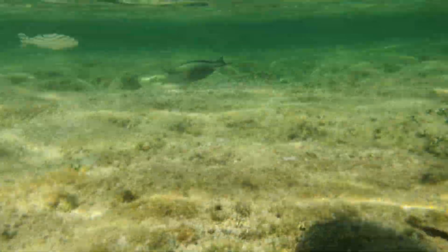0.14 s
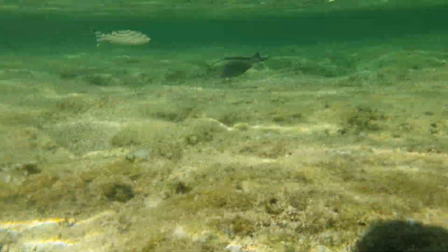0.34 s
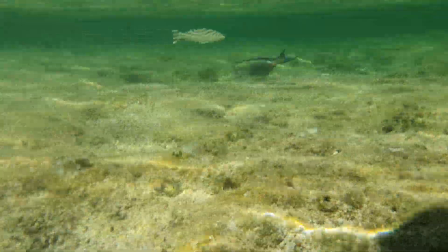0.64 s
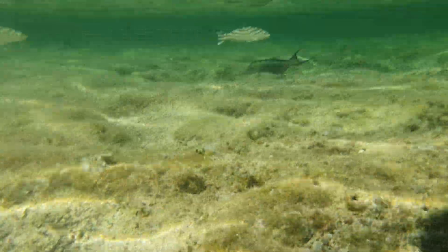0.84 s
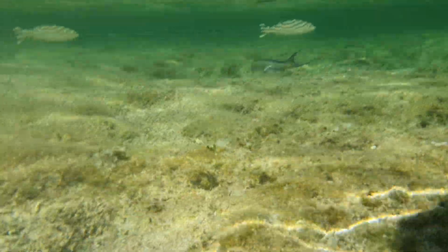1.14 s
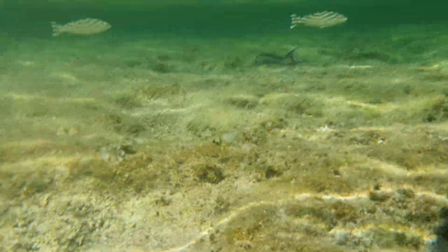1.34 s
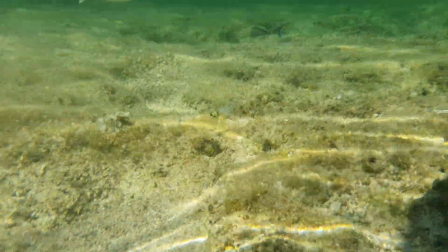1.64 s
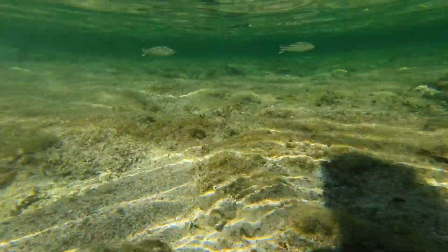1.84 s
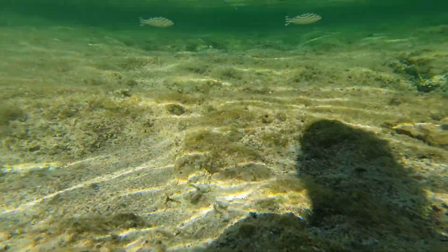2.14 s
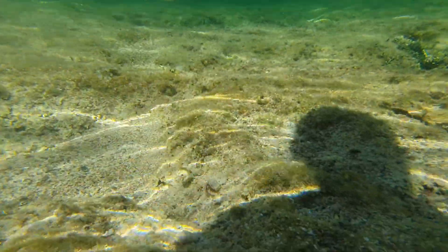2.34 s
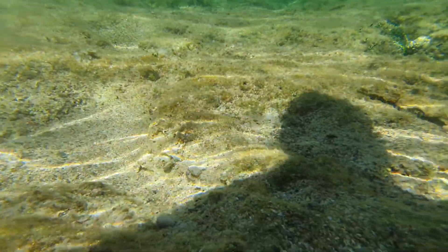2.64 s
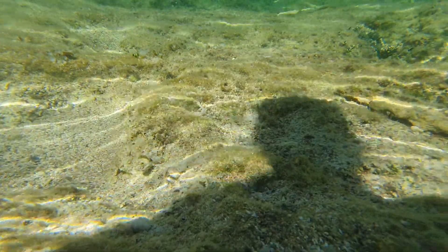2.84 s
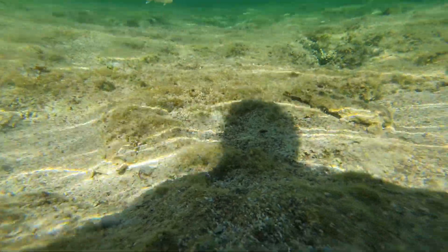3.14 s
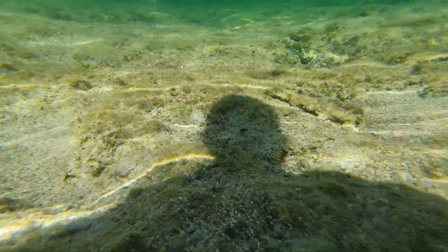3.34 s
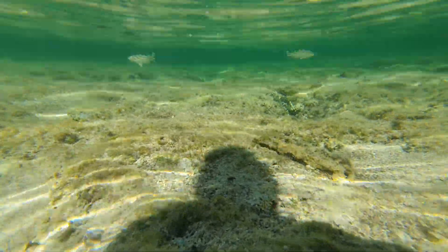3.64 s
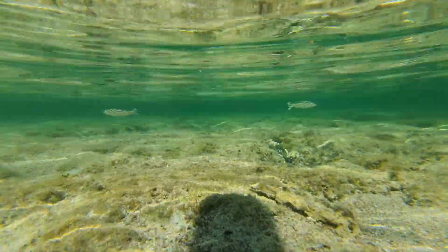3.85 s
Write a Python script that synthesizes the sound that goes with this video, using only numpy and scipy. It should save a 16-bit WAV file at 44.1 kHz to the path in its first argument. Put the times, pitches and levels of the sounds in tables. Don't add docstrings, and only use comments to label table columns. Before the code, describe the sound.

Deep, uneven underwater rumble runs throughout, heard from inside a sealed camera housing in shallow sea. Small ticks and knocks open it; a heavy thump with a bubble comes at 0.4 s. The rumble swells around 1.2-1.5 s, with softer bumps and very faint hiss and rubbing. Bubbles gulp from 3.2 s, water slaps with clustered knocks and heavy bumps at 3.65-3.75 s, then again at 3.87 s, with a hard crack at 3.91 s.

```python
import sys
import numpy as np
from scipy import signal
from scipy.fft import rfft, irfft
from scipy.io import wavfile

SR = 44100
rng = np.random.default_rng(int(sys.argv[2]) if len(sys.argv) > 2 else 0)


def inscribe(sig):
    pcm = np.round(np.clip(np.atleast_2d(sig).T, -1, 1) * 32767)
    wavfile.write(sys.argv[1], SR, pcm.astype(np.int16))


def volts_from_decibels(level):
    exponent = np.asarray(level, float) / 20
    return 10 ** exponent


N = 176400

# t/s, level/dB
FLOW_DB = [(0, -35.5), (.11, -37.5), (.79, -36.5), (.96, -34.5), (1.14, -38.5), (1.21, -31), (1.45, -31.5),
           (1.71, -35), (1.86, -31), (2.55, -35), (3.36, -31.5), (3.63, -26), (3.76, -23), (3.82, -35),
           (3.92, -22), (4, -33.5)]
# f/Hz, density/dB per Hz
RUMBLE_SPECTRUM = [(18, -27.5), (30, -8), (43, 2), (72, 3), (125, -6), (175, -3), (215, -7.5), (310, -28),
                   (520, -43.5), (700, -79)]
# t/s, peak level/dB, f/Hz
BUMPS = [(0.434, -12.5, 96.4), (0.434, -0.5, 252.3), (1.198, -21, 170), (1.364, -13.5, 92),
         (1.379, -15.5, 68), (1.475, -14, 178), (2.233, -18, 129), (2.302, -17.5, 188), (2.968, -18.5, 74),
         (3.088, -19, 173), (3.222, -12.5, 244), (3.408, -12, 96), (3.52, -16.5, 106.6),
         (3.688, -13.5, 165), (3.705, -15, 59), (3.746, -1, 162), (3.871, -5, 167), (3.913, -10, 147.6)]
# t/s, peak level/dB, f/Hz
KNOCKS = [(0.115, -28.5, 2130), (0.13, -39, 1750), (0.164, -38, 1740), (0.178, -44, 764),
          (0.575, -35.5, 1780), (0.143, -44, 3700), (0.628, -41.5, 680), (0.735, -45.5, 770),
          (0.754, -43, 759), (0.874, -32, 2850), (0.937, -35, 706), (1.378, -37, 1700), (1.704, -38, 2400),
          (1.825, -38, 790), (1.991, -38, 830), (2.053, -46.5, 604), (1.478, -45, 700), (3.226, -47.5, 840),
          (3.584, -40, 1720), (3.636, -39, 1090), (3.674, -42, 1870), (3.684, -36.5, 1940),
          (3.702, -23.5, 1470), (3.708, -21, 1260), (3.721, -31, 1970), (3.727, -58, 1050),
          (3.737, -34, 1900), (3.654, -22, 1650), (3.699, -21, 2130), (3.748, -17.5, 920),
          (3.852, -31, 1800), (3.858, -23, 784), (3.862, -23, 983), (3.872, -23, 1000), (3.879, -41, 1050),
          (3.887, -32, 895), (3.894, -45, 1750), (3.970, -38, 1800), (3.991, -37, 2000)]
# t/s, peak level/dB, f/Hz, glide/octaves per s, t60/s
BUBBLES = [(.441, -15, 340, 0.1, 0.065), (.460, -52, 780, 0.61, .1), (3.224, -25.5, 516, 140, .03),
           (3.227, -22.5, 458, 0.46, 0.067), (3.264, -42.5, 900, 9.4, 0.027), (3.410, -19, 730, 72, 0.03),
           (3.425, -30, 780, 1.4, 0.07), (3.45, -34.5, 1025, 8, 0.048), (3.454, -52, 1830, 0.35, 0.052),
           (3.517, -32.5, 500, 5.5, 0.046), (3.519, -44, 870, 14, 0.069), (3.516, -47, 1800, 0.36, 0.08),
           (3.845, -27, 384, 2.8, 0.032), (3.864, -23.5, 414, 3, 0.042)]
# f/Hz, level/dB, t60/s
CRACK_MODES = [(1170, 7, 0.013), (2100, 12, 0.010), (620, -3, .008), (3560, -24, .005)]
# t/s, level/dB
WASH_DB = [
    (3.45, -71.5),
    (3.58, -54),
    (3.645, -55),
    (3.66, -46),
    (3.71, -42),
    (3.77, -51),
    (3.825, -62),
    (3.865, -46),
    (3.905, -62.5),
    (3.96, -55.5),
]
# f/Hz, density/dB per Hz
WASH_SPECTRUM = [(400, 2.5), (900, -4.5), (2100, 1), (3200, -26.5), (5000, -25), (7800, -40.5),
                 (11000, -27.5), (15500, -50.5)]
# t/s, bright peak level/dB, dull part re bright/dB
TICKS = [(0.1152, -49.5, 4), (0.1315, -54, 9.5), (0.1532, -54.5, 0), (0.165, -44, 9), (0.1763, -49, 11),
         (0.5738, -43, -5.5), (0.2157, -63, 5), (0.2577, -69.5, 2), (0.7353, -67, 8), (0.872, -64, 12),
         (0.9065, -68, 14), (0.9344, -60, 14), (0.9557, -55, 3), (1.1027, -68, 2), (1.2964, -54.5, 3),
         (1.3887, -63, 12), (1.4733, -61, -8), (1.8208, -54.5, -1), (1.3483, -65, 17.5), (2.2853, -51, -2),
         (2.366, -54, 0), (2.9398, -50.5, -4.5), (3.0769, -56, 9), (3.039, -63, -3.5), (3.235, -56.5, 2),
         (3.2856, -57.5, 11), (3.4639, -46.5, 3), (3.5847, -55.5, 3), (3.606, -43, 5.5), (3.634, -44, 3.5),
         (3.6106, -46.5, 4), (3.6507, -49, 4.5), (3.667, -47, 12.5), (3.68, -44.5, 0.5), (3.698, -34, 9),
         (3.713, -38.5, 5), (3.722, -44.5, 6), (3.7298, -44.5, -1), (3.7655, -51.5, 17),
         (3.7904, -50, 13.5), (3.8138, -49, -3), (3.839, -44, 4), (3.863, -59, 8), (3.93, -62, 10),
         (3.9523, -55, 10), (3.991, -53.5, 10)]
# f/Hz, width/Hz, level re plain path/dB
SHELL_MODES = [(780, 200, 4.5), (1800, 110, 2), (4080, 420, 11), (10400, 5200, -2)]
# f/Hz, width/Hz, level/dB
SEEP_MODES = [(1776, 57, 1.5), (2293, 337, 7.5), (2470, 254, -8)]
# t/s, level/dB
SEEP_DB = [
    (0, -70),
    (.9, -65.5),
    (1.7, -59.5),
]
# start t/s, length/s, level/dB, f/Hz
RUBS = [
    (1.318, 0.23, -62.5, 1280),
    (1.787, 0.29, -60, 1640),
    (2.065, 0.11, -60.5, 1730),
    (2.194, 0.21, -65.5, 1650),
]
# start t/s, length/s, level re still air/dB
FIZZ_SWELLS = [
    (0, 0.093, 6),
    (0.092, .2, 9),
    (0.554, 0.088, 5),
    (0.853, 0.16, 5),
    (1.094, 0.054, 4),
    (1.278, 0.27, 7.5),
    (1.508, 1.9, 4),
    (3.017, 0.13, 3),
    (3.204, 0.19, 8.5),
    (3.423, 0.18, 8),
]
# f/Hz, density/dB per Hz
HISS_SPECTRUM = [(350, -6), (900, -7.5), (1500, -13), (2200, -4), (3200, -25.5), (4500, -27.5), (5500, -33),
                 (6600, -33.5), (7600, -51), (15500, -46)]
# t/s, level/dB
SONG_DB = [
    (1.509, -84),
    (1.6, -80),
    (2.851, -79),
    (2.911, -79),
]
INSECT_BAND_HZ = [9500, 11100]
# f/Hz, level/dB
PORT_TILT_DB = [(100, -.1), (300, -.9), (520, -1), (700, 5.0), (1500, 6.5), (2500, 3), (3300, 7), (5500, 7),
                (7500, 3), (10000, -7.0), (13000, -1.5)]
# f/Hz, level/dB
PORT_OWN_DB = [(30, -26), (150, -15), (400, -7), (700, -1), (1400, 0), (2300, -4), (3300, 5), (10000, 6)]


def table(rows, at, log=False):
    x, y = np.transpose(rows)[:2]
    return np.interp(np.log(at + 1), np.log(x + 1), y) if log else np.interp(at, x, y)


def clock():
    return np.arange(N) / SR


def rms_one(x):
    return x / np.sqrt(np.mean(x ** 2) + 1e-20)


def band(x, order, edges_hz):
    sos = signal.butter(order, edges_hz, "band", fs=SR, output="sos")
    return signal.sosfilt(sos, x + 1e-18)


def drift(rate_hz):
    r = np.exp(-80 * np.pi * rate_hz / SR)
    white = rng.standard_normal(N // 40 + 2002)
    slow = signal.lfilter([1], [1, -2 * r, r * r], white)[2000:]
    return np.interp(np.arange(N) / 40, np.arange(len(slow)), rms_one(slow))


def peak(x, f_hz, width_hz):
    r = np.exp(-np.pi * width_hz / SR)
    zeros = np.array([1, 0, -1]) * (1 - r * r) / 2
    poles = [1, -2 * r * np.cos(2 * np.pi * f_hz / SR), r * r]
    return signal.lfilter(zeros, poles, x + 1e-18)


def add(out, start_s, level_db, f_hz, t60_s, rise_s=1e-4, glide_oct_s=0.):
    t = np.arange(int(.15 * SR)) / SR
    rise = 1 - np.exp(-(t / rise_s) ** 2)
    burst = np.exp(-(glide_oct_s * t) ** 6)
    phase = 2 * np.pi * np.cumsum(f_hz * 2 ** (glide_oct_s * t)) / SR
    swing = volts_from_decibels(level_db - 60 * t / t60_s) * rise * burst * np.sin(phase)
    i = int(start_s * SR)
    out[..., i:i + len(t)] += swing[..., :N - i]


def coloured(spectrum, together_db, own_db, rate_hz):
    hz = np.arange(N // 2 + 1) * SR / N
    low_hz, high_hz = spectrum[0][0], spectrum[-1][0]
    mids_hz = low_hz * 2 ** np.arange(0, np.log2(high_hz / low_hz) + .5, .5)
    white = rfft(rng.standard_normal((3, N))) * volts_from_decibels(table(spectrum, hz, True))
    together = drift(rate_hz)
    out = 0
    for mid_hz in mids_hz:
        share = np.cos(np.pi * np.clip(np.log2((hz + 1) / mid_hz), -.5, .5)) ** 2
        flicker_db = together_db * together + own_db * drift(rate_hz * 2)
        out = out + irfft(white * share, N) * volts_from_decibels(flicker_db)
    return rms_one(out)


def grains(per_s, spread_db):
    hit = rng.random(N) < per_s / SR
    size = volts_from_decibels(spread_db * np.minimum(rng.exponential(1, N), 4))
    return hit * size * rng.choice([-1, 1], N)


def shell(x):
    return x + sum((volts_from_decibels(db) - 1) * peak(x, hz, width) for hz, width, db in SHELL_MODES)


def rumble():
    water = coloured(RUMBLE_SPECTRUM, 2.2, 1.28, 10.9)
    eddies = band(grains(44, 3.4), 4, [55, 220])
    water[0] += volts_from_decibels(-9.5) * rms_one(eddies)
    return volts_from_decibels(table(FLOW_DB, clock()) + 2) * water


def bumps():
    out = np.zeros(N)
    for s, db, hz in BUMPS:
        add(out, s, db - 3 + 11.5, hz, t60_s=2.91 / hz + 0.014, rise_s=0.0048)
    return out


def knocks():
    out = np.zeros(N)
    trim_db = 2
    snap_modes = ((700, -4.0), (1250, -22.5), (2300, -7.0), (4200, -27.0))  # Hz, dB
    for s, db, hz in KNOCKS:
        add(out, s, db + trim_db - 4.0, hz, t60_s=21 / hz, rise_s=.0008)
        for snap_hz, snap_db in snap_modes:
            level_db = db + trim_db + snap_db + rng.normal(0, 3)
            add(out, s, level_db, snap_hz * rng.uniform(0.73, 1.203), t60_s=0.0073, rise_s=.0003)
    return out


def bubbles():
    out = np.zeros(N)
    for s, db, hz, glide_oct_s, t60_s in BUBBLES:
        add(out, s, db, hz, t60_s, 1.42 / hz, glide_oct_s)
    return out


def crack():
    out = np.zeros(N)
    for hz, db, t60_s in CRACK_MODES:
        add(out, 3.9132, db - 8, hz, t60_s, rise_s=.0009)
    return out


def wash():
    t = clock()
    water = coloured(WASH_SPECTRUM, 2.2, 2.5, 56)
    drops = grains(460, 5.5) * rng.standard_normal((3, N))
    spray = rms_one(band(drops, 2, [8500, 12500]))
    spray = volts_from_decibels(-22) * spray * np.clip((t - 3.56) / 0.014, 0, 1)
    splat = band(grains(900, 4.6), 4, [900, 2300])
    water[0] += volts_from_decibels(-4) * rms_one(splat)
    onset = np.clip((t - WASH_DB[0][0]) / 0.026, 0, 1)
    return volts_from_decibels(table(WASH_DB, t)) * onset * shell(water + spray)


def ticks():
    out = np.zeros((2, N))
    for s, db, dull_db in TICKS:
        modes = ((9700, 4.5), (11200, 11.0), (12000, -6.0), (2400, dull_db),
                 (3900, dull_db - 3.5), (5600, dull_db - 3.0), (7100, dull_db - 4))
        for row in out:
            for hz, part_db in modes:
                level_db = db - 8.5 + part_db + rng.normal(0, 2.9)
                add(row, s, level_db, hz * rng.uniform(0.84, 1.27), t60_s=14 / hz, rise_s=1 / hz)
    return out


def seep():
    t = clock()
    white = rng.standard_normal((3, N))
    air = sum(volts_from_decibels(db) * peak(peak(white, hz, width), hz, 2 * width) for hz, width, db in SEEP_MODES)
    on = np.clip((1.715 - t) / 0.0056, 0, 1)
    return volts_from_decibels(table(SEEP_DB, t) + 1.5 * drift(30)) * on * rms_one(air)


def rubs():
    t = clock()
    white = rng.standard_normal((3, N))
    out = np.zeros((3, N))
    for s, length_s, db, hz in RUBS:
        stroke = np.sin(np.pi * np.clip((t - s) / length_s, 0, 1)) ** 1.66
        friction = rms_one(peak(peak(white, hz, 560), hz, 870))
        out += volts_from_decibels(db + 1.1 * drift(40)) * stroke * friction
    return out


def fizz():
    t = clock()
    swell_db = sum(db * np.sin(np.pi * np.clip((t - s) / length_s, 0, 1)) ** .8
                   for s, length_s, db in FIZZ_SWELLS)
    crackle = np.abs(rms_one(grains(300, 5.0)))
    air = rng.standard_normal((3, N)) * (1 + volts_from_decibels(-5.5) * crackle)
    mid_hz, width_hz = 10500, 2500
    air = rms_one(band(air, 3, [mid_hz - width_hz / 2, mid_hz + width_hz / 2]))
    return volts_from_decibels(-86.5 - 8 + swell_db + 1.5 * drift(15)) * air


def hiss():
    return volts_from_decibels(-65) * rms_one(shell(coloured(HISS_SPECTRUM, 1.0, 1.0, 25)))


def insect():
    t = clock()
    rate_hz = 441 * (1 + 0.0016 * drift(4.0) + 0.046 * rng.standard_normal(N))
    turns = np.cumsum(rate_hz) / SR
    clicks = np.diff(np.floor(turns), prepend=0) * volts_from_decibels(4.0 * rng.standard_normal(N))
    tone = peak(clicks, 10140, 4.0 / 0.0026)
    tone = rms_one(band(tone, 4, INSECT_BAND_HZ))
    on = np.clip(np.minimum(t - SONG_DB[0][0], SONG_DB[-1][0] - t) / 0.017, 0, 1)
    pan_db = -17
    pan = volts_from_decibels(np.array([[pan_db / 2], [-pan_db / 2]]))
    return on * volts_from_decibels(table(SONG_DB, t) + 2.0 * drift(25)) * tone * pan


def ports(rows):
    size = N + 4096
    hz = np.arange(size // 2 + 1) * SR / size
    padded = np.pad(rows, ((0, 0), (2048, 2048)), "reflect", reflect_type="odd")
    shared, left, right = rfft(padded)
    lag_s = 33 / 44100
    lag_rad = (2 * np.pi * lag_s * hz - .9) / (1 + (520 / (hz + 1)) ** 4)
    own = volts_from_decibels(table(PORT_OWN_DB, hz, True))
    pair = np.array([shared + own * left, shared * np.exp(-1j * lag_rad) + own * right])
    tilt = volts_from_decibels(table(PORT_TILT_DB, hz, True) * [[.5], [-.5]])
    return irfft(pair * tilt, size)[:, 2048:-2048]


def scene():
    rows = rumble() + wash() + seep() + rubs() + fizz() + hiss()
    rows[0] += bumps() + knocks() + bubbles() + crack()
    rows[1:] += ticks()
    return ports(rows) + insect()


def low_pass(x):
    return signal.sosfilt(signal.butter(12, 15800, fs=SR, output="sos"), x)


def record(dry):
    return low_pass(dry)


dry = scene()
out = record(dry)
inscribe(out)
```